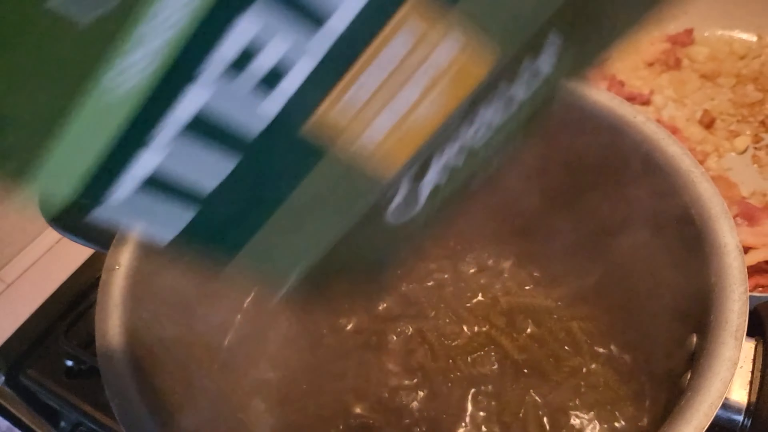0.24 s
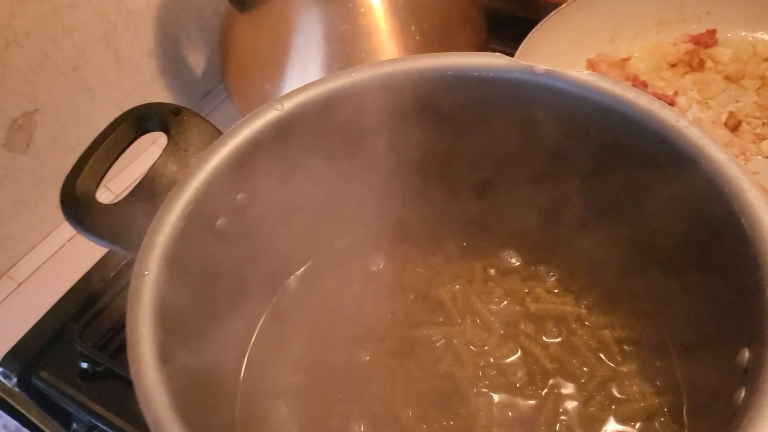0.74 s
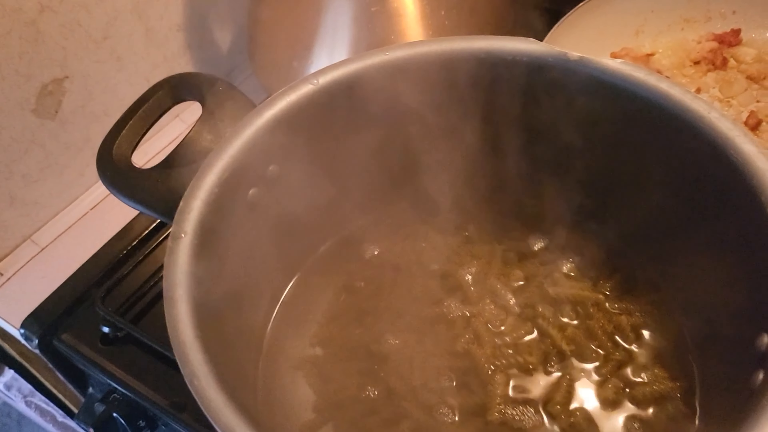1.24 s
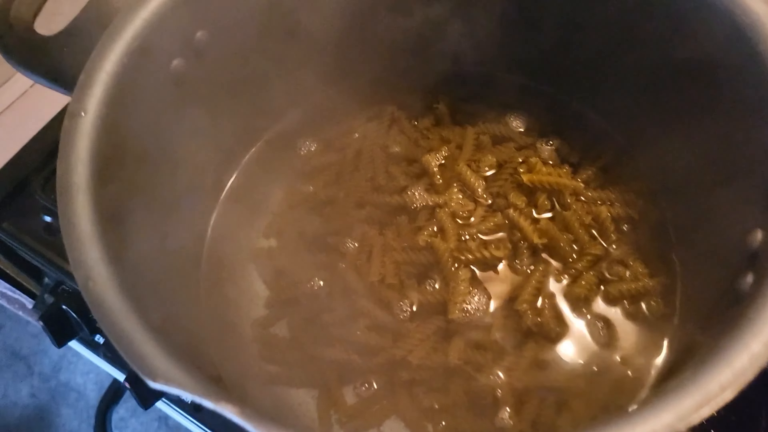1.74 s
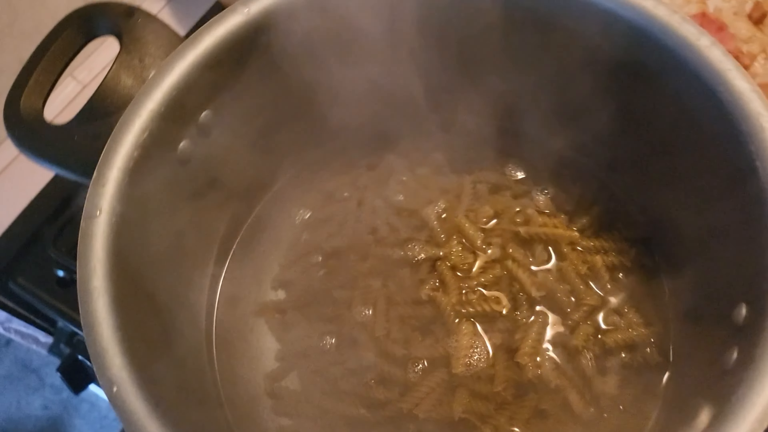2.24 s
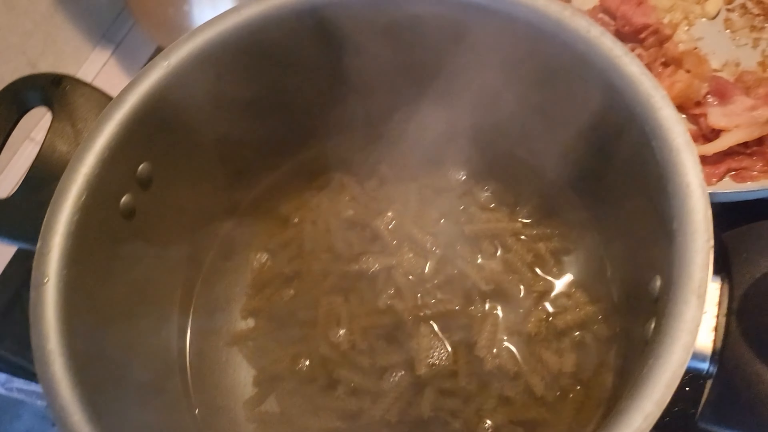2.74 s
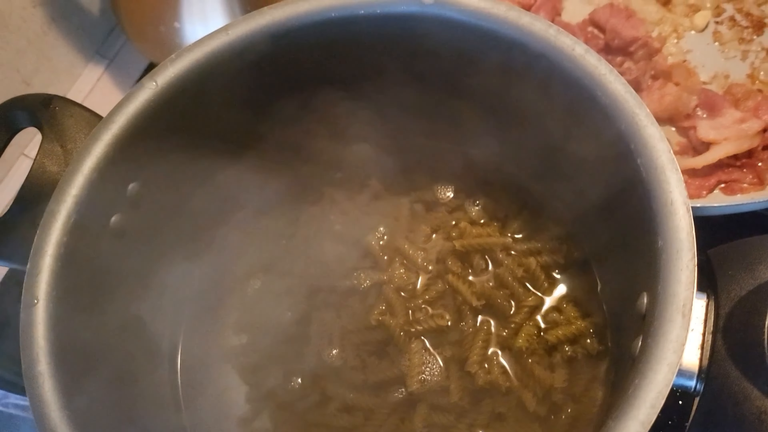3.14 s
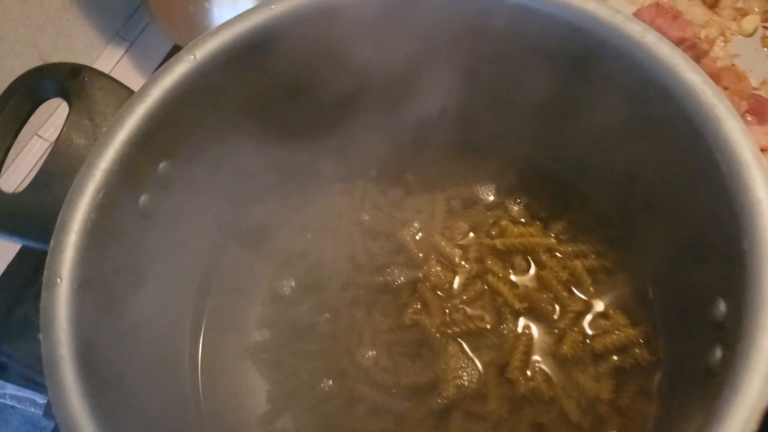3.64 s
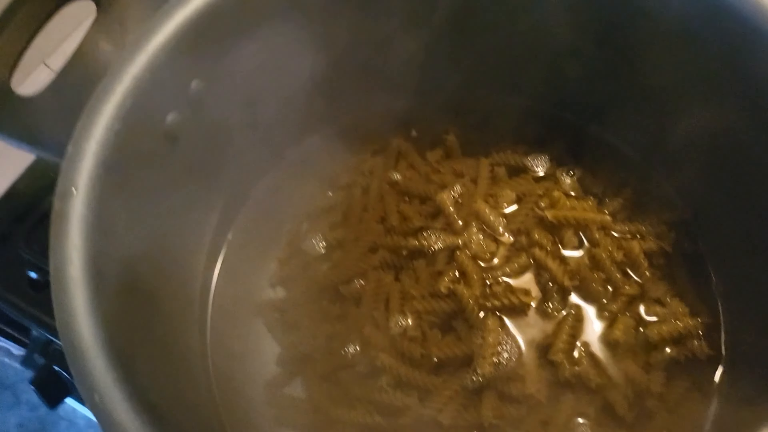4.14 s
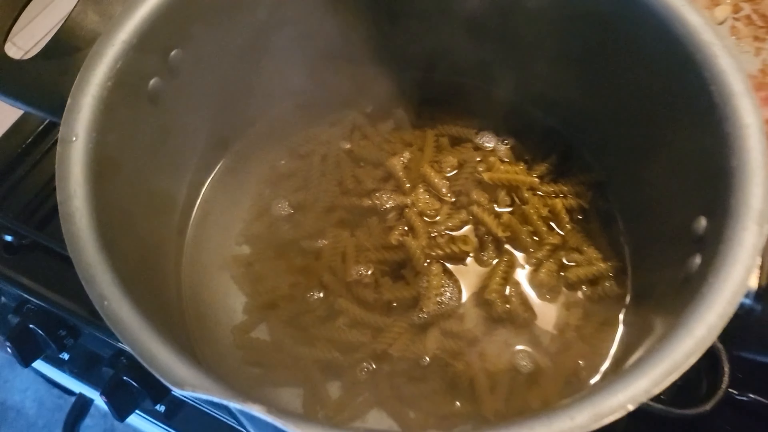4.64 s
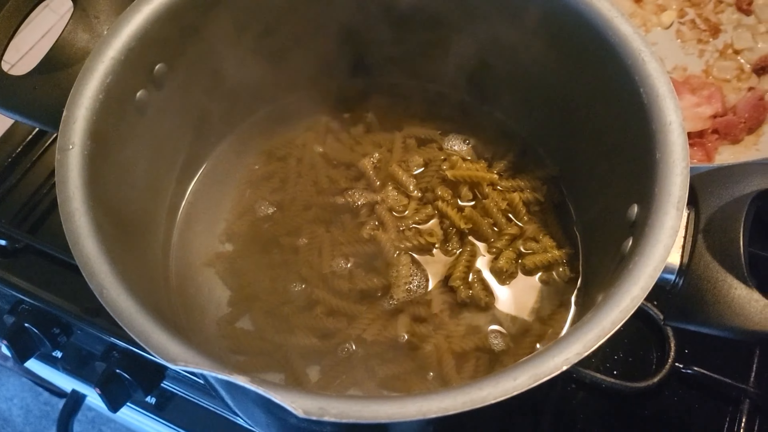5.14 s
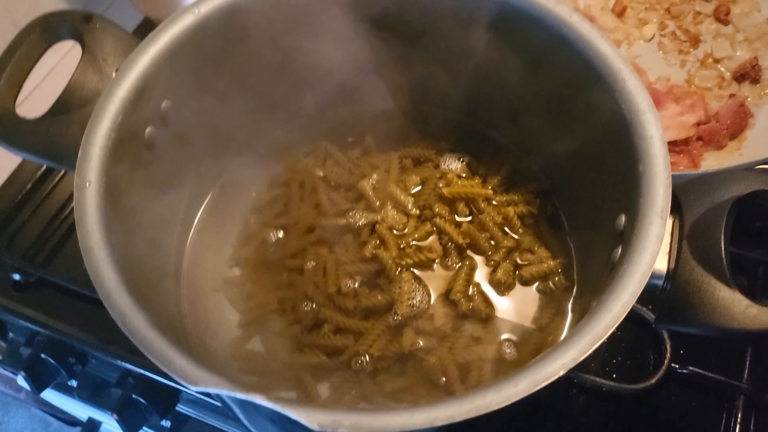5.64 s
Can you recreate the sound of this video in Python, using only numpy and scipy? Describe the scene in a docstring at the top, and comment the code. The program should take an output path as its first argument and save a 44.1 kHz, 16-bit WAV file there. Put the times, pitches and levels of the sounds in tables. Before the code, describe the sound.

A burst of bright, dry pasta clicks opens abruptly and dies within a fraction of a second. Over soft gas-flame rumble, thin hiss and quiet simmering, the card box taps and scuffs in a hand while water plops. Past the middle it lands with a loud, chattering knock, then the simmer continues. Small kitchen, close handheld stereo microphone.

```python
"""Dry pasta into a hot pot

The last pasta rattles out of a card box into hot water on a gas ring: brief impacts, filtered and ringing.
The box rustles and scuffs (dense random slips), the water plops and spits (decaying sines).
The box is set down with a sharp, chattering knock: impulses that crack and excite damped modes.
Filtered noise rumbles and hisses throughout; two microphone ports a hand apart hear it all in a small kitchen."""
import sys
import numpy as np
from scipy import signal
from scipy.fft import rfft, irfft, next_fast_len
from scipy.io import wavfile

SR = 44100
rng = np.random.default_rng(int(sys.argv[2]) if len(sys.argv) > 2 else 0)


def inscribe(sig):
    """Save sig as 16-bit PCM at rate SR to the path in sys.argv[1].

    A 1-D sig is mono; a 2-D sig holds one channel per row.
    Samples are clipped to [-1, 1] before scaling.
    """
    pcm = np.round(np.clip(np.atleast_2d(sig).T, -1, 1) * 32767)
    wavfile.write(sys.argv[1], SR, pcm.astype(np.int16))


N = 259731
TIME = np.arange(N) / SR
SIZE = next_fast_len(N + SR)   # padded transform length

# Levels are relative: each is set before softening, panning and the mix.
# clumps of pasta striking the mouth of the box: (t/s, level/dB, contact brightness f/Hz)
PASTA_STRIKES = [(0.0005, -20, 5000), (0.0048, -20, 15000), (0.0068, -14.5, 18000), (0.0142, -26, 12000),
                 (0.026, -27.5, 14000), (0.037, -30.5, 16000), (0.041, -29, 9000), (0.053, -32, 9000),
                 (0.063, -34.5, 12000), (0.07, -36, 8000), (0.0796, -31, 12500), (0.0872, -27, 9100),
                 (0.096, -45, 4500), (0.102, -43, 4500), (0.109, -39.5, 12000), (0.118, -42, 9000),
                 (0.13, -50, 18000), (0.152, -47, 9000), (0.169, -49.5, 10000), (0.22, -50.5, 6500),
                 (0.248, -61, 8100), (0.284, -63, 14100)]
# spectrum of pasta against card: (f/Hz, level/dB)
PASTA_SPECTRUM = [(500, -26.5), (950, -24.5), (1250, -13.5), (1850, -8.5), (2150, -8), (2480, 1.5),
                  (2900, -5), (3400, 5.5), (4200, -3), (4800, -0.5), (5500, -0.5), (6200, 4), (7200, -5),
                  (8000, -0.5), (8700, -8.5), (12500, -1), (15500, -9.5)]
# the box landing, rocking and coming to rest on the counter: (t/s, level/dB, contact brightness f/Hz)
BOX_KNOCKS = [(3.4074, -20.5, 19400), (3.4102, -13.5, 17000), (3.4137, -10.5, 12000), (3.4183, -13, 9000),
              (3.4227, -9.5, 5900), (3.4289, -13, 9000), (3.4312, -13, 5000), (3.4332, -14, 9050),
              (3.4371, -19, 3000), (3.4432, -20, 9000), (3.4513, -24.5, 1494), (3.459, -12, 251),
              (3.4807, -36, 16000), (3.4829, -30, 4000), (3.4853, -30.5, 7000), (3.4903, -30, 9000),
              (3.4977, -35, 4000), (3.502, -37, 14000), (3.5072, -32.5, 12000), (3.5116, -33.5, 3970),
              (3.5166, -38.5, 2470), (3.5982, -44, 600), (3.624, -46, 700), (3.7072, -46.5, 520)]
# spectrum of the card cracking against the counter: (f/Hz, level/dB)
CRACK_SPECTRUM = [(25, -25), (60, -11), (120, -7.5), (195, -9), (250, -5.5), (370, 3), (520, -8.5),
                  (720, -0.5), (900, -6.5), (1150, -5.5), (1850, -10), (2750, -15), (3150, -18),
                  (3700, -17.5), (4800, -23), (6300, -17), (7500, -24.5), (8700, -31), (12000, -28.5),
                  (14000, -25.5), (15500, -24.5)]
# box and counter ringing together: (f/Hz, level/dB, t60/s)
BOX_COUNTER_MODES = [(133.2, -19, 0.21), (160, -11, 0.15), (256.6, -22.5, 0.27), (348, -18.5, 0.13),
                     (380.5, -20, 0.18), (527, -28, 0.18), (645, -33, 0.3), (741, -9.5, 0.05),
                     (1074, -19.5, 0.06), (1184, -9.5, 0.052), (1536, -14, 0.068), (1996, -19.5, 0.05),
                     (2470, -23, 0.037), (2720, -17, 0.049)]
# the larger bubbles bursting in the pot: (t/s, level/dB, f/Hz)
LARGE_PLOPS = [(0.098, -45, 396), (0.166, -46, 254), (0.8135, -35, 534), (1.0498, -43.5, 590),
               (1.101, -54, 320), (1.267, -40.5, 536), (2.170, -47.5, 320), (2.214, -49, 322),
               (2.440, -43.5, 335), (2.518, -44, 676), (2.5709, -44.5, 700), (2.661, -51, 325),
               (3.179, -48.5, 292)]
# air in the pot, sounded by bursts: (f/Hz, level/dB, t60/s)
POT_AIR_MODES = [(318.3, -12.5, 0.22), (500, -5, 0.0087), (649, -2, 0.03), (800, -23, 0.013),
                 (1520, -49, 0.034), (2240, -35, 0.014)]
# drops spitting and hot metal ticking: (t/s, level/dB, f/Hz, t60/s)
SPIT_TICKS = [(0.548, -56, 6360, 0.0054), (0.665, -44.5, 6100, 0.003), (0.6684, -46.5, 12400, 0.0016),
              (0.7485, -50, 14760, .007), (2.52, -52, 1465, 0.15), (3.8807, -55.5, 12450, 0.0019),
              (4.8520, -46, 2790, 0.014), (4.8529, -52, 1185, 0.011), (4.8517, -49, 410, 0.019)]
# the box slipping in the hand:
# (peak t/s, rise/s, fall/s, level/dB, treble level/dB, rasp of the flap level/dB)
HAND_SLIPS = [(0.348, 0.018, 0.006, -66.5, 7.5, -23), (0.48, 0.023, 0.031, -68.5, -29.5, -25),
              (0.80, 0.029, 0.048, -72, -3, -21), (1.42, 0.15, 0.092, -67, 0, -9),
              (2.179, 0.0063, 0.006, -68, 5.5, -4.5), (2.535, 0.0071, 0.08, -78, 2.5, -4),
              (3.235, 0.048, 0.011, -66, -3.5, -15)]
# spectrum of card under the fingers: (f/Hz, level/dB)
RUSTLE_SPECTRUM = [(130, -37), (250, 2), (330, 4.5), (500, -3.5), (720, -1), (1000, -16), (1400, -5.5),
                   (1750, -14.5), (2300, -6.5), (3200, -15), (5000, -17), (6300, -13), (8500, -25),
                   (15500, -23)]
# the gas ring and pot: (t/s, rumble level/dB, simmer level/dB)
BURNER_LEVELS = [(0.0, -51, -61), (2.29, -51.5, -60.5), (2.95, -54, -63), (3.49, -53, -64.5),
                 (3.82, -55, -62.5), (5.53, -48.5, -61.5), (5.89, -49.5, -63)]
# spectra of flame, simmer and gas: (f/Hz, level/dB)
RUMBLE_SPECTRUM = [(12, -29.5), (20, 2.5), (48, -4), (70, 0.5), (85, -1), (108, -9), (146, -9.5),
                   (201, -22.5), (260, -42), (340, -77.5), (570, -120)]
SIMMER_SPECTRUM = [(140, -40), (230, -10), (350, 9), (480, 0.5), (650, -1.5), (850, 2.5), (1050, 5.5),
                   (1300, 5), (1700, -13.5), (2400, -22), (4400, -43)]
HISS_SPECTRUM = [(1000, -20.5), (1800, -2), (2500, -4), (3800, -6.5), (5000, -12.5), (7000, -14),
                 (8400, -26.5), (11000, -28), (15500, -26)]
# reverberation time of the kitchen: (f/Hz, t60/s)
ROOM_DECAY = [(100, 0.28), (500, 0.28), (2000, 0.13), (4000, 1), (14000, 0.073)]
# fingers and loose pasta tapping the card: (t/s, level/dB, contact brightness f/Hz)
CARD_TAPS = [(0.339, -42, 5000), (0.349, -43.5, 9000), (0.358, -50, 5000), (0.49, -56, 4000),
             (0.745, -47, 4000), (1.2038, -39.5, 9040), (1.207, -43.5, 5000), (1.2675, -47, 5000),
             (1.276, -48, 7000), (1.298, -47, 5000), (1.360, -48, 7000), (1.420, -48, 14000),
             (1.447, -52, 10000), (1.461, -42, 14000), (1.4722, -42, 6500), (1.478, -45, 5000),
             (2.1712, -51, 9500), (2.519, -45.5, 5006), (3.2268, -35, 6500), (3.235, -38.5, 4000),
             (3.2634, -44, 3500), (3.272, -45, 4000), (3.5812, -37.5, 1500), (3.5862, -32.5, 980),
             (3.594, -34, 905), (3.8835, -46.5, 6000)]
# spectrum of a tap: (f/Hz, level/dB)
TAP_SPECTRUM = [(120, -20.5), (300, 2.5), (500, -6.5), (680, 7.5), (950, -4.5), (1400, -0.5), (1800, -4.5),
                (2300, -19), (2800, -11.5), (3300, -20.5), (6300, -15.5), (8500, -37), (15500, -37)]
# modes of the tapped card: (f/Hz, level/dB, t60/s)
CARD_MODES = [(660, -29, 0.075), (1500, -11, 0.026), (2200, -26, 0.037)]
# resonances that the simmer keeps sounding: (f/Hz, level/dB, t60/s)
SIMMER_MODES = [(351.3, -8, 0.31), (615.6, 0.5, 0.041), (1220, -10.5, 0.08)]
# the card scuffing past a hand or the counter:
# (start t/s, length/s, level/dB, hollow of the box level/dB, airy treble level/dB, flap f/Hz)
SCUFF_STROKES = [(0.32, 0.045, -75, 15, -11, 2130), (1.264, 0.034, -62, -5, -22, 2430),
                 (1.392, 0.055, -73, 7, 4, 2530), (1.449, 0.019, -62.5, -17, -2, 4070),
                 (1.487, 0.05, -66.5, -9, -7, 2620), (1.725, 0.13, -60.5, 7.5, -8, 2450)]
# the hollow of the box: (f/Hz, level/dB, t60/s)
BOX_AIR_MODES = [(313, -7.5, 0.03), (692, -2.5, 0.045), (927, -2.5, 0.031), (1370, -8.5, 0.033)]
# the water coming back to the boil: (t/s, level/dB)
BOIL_LEVELS = [(0.0, -66), (2.4, -78.5), (4.2, -80), (4.9, -75.5), (5.3, -69.5), (5.45, -73.5), (5.67, -66),
               (5.89, -74)]
# the gas jet's faint whistles: (f/Hz, level/dB)
WHISTLE_TONES = [(930, -7), (1342, -7), (1690, -12.5)]
# their common level: (t/s, level/dB)
WHISTLE_LEVELS = [(0.0, -82.5), (2.0, -74.5), (2.8, -73.5), (4.0, -78.5), (5.89, -77)]

PORT_LAG_S, CUTOFF_HZ = .00044, 16000
EARLY_T60_S, LATE_DB = 0.1, -18.5   # near walls answer at once; the rest of the room lingers faintly
TAIL_T60_S, TAIL_TOP_HZ = .27, 3500   # what lingers after a contact is dull
SLIDE_DB, SLIDE_FADE_DB_PER_S = -35, 211.5   # the stream of pasta thins out as the box empties
SMALL_PLOPS_PER_S, SMALL_PLOP_DB, CALM_S = 7, -56, 2.7   # small ones stop once the water has calmed
GRIP_DB, GRIP_WAVER_DB = -79.5, 2   # the card creaks faintly for as long as it is held
FLAP_HZ, FLAP_T60_S = 2280, 0.0061   # the open flap rasps at its own pitch
SCUFF_ATTACK, SCUFF_RELEASE = 0.53, 0.25   # shares of a scuff's length
SCUFF_SAG_OCTAVES_PER_S, SCUFF_AIR_HZ = 1.4, 6100   # the rasp sinks as the stroke goes on
HISS_DB = -74.5   # the gas flows steadily
BOIL_HZ, BOIL_T60_S = 582, 0.099   # the pot rings with the boil


def from_db(db):
    """Logarithmic level: 20 dB is a tenfold amplitude."""
    return 10 ** (np.asarray(db) / 20)


def rms_one(x):
    """Normalization to unit mean-square power."""
    return x / np.sqrt(np.mean(x ** 2) + 1e-20)


def in_time(rows):
    """Linear interpolation in time, one curve per column."""
    s, *columns = np.transpose(rows)
    return [np.interp(TIME, s, c) for c in columns]


def at_hz(points, hz):
    """Linear interpolation on a logarithmic frequency axis."""
    f, value = np.transpose(points)
    return np.interp(np.log(np.maximum(hz, 1)), np.log(f), value)


def drift(rate):
    """Slow random modulation: unit-variance Gaussian knots, rate per second, joined by lines."""
    knots = rng.standard_normal(int(N / SR * rate) + 2)
    return np.interp(TIME * rate, np.arange(len(knots)), knots)


def click(s, db):
    """Impulse excitation at time s."""
    out = np.zeros(N)
    out[int(np.clip(s * SR, 0, N - 1))] = from_db(db)
    return out


def grains(per_s, spread_db):
    """Random impulse train: tiny contacts of uneven size and either sign."""
    sizes = from_db(spread_db * np.minimum(rng.exponential(1, N), 4))
    signs = rng.choice([-1, 1], N)
    return sizes * signs * (rng.random(N) < per_s / SR)


def ring(x, hz, t60):
    """Damped resonator: a unit impulse starts a decaying sine of initial height 1."""
    radius, w = from_db(-60 / (t60 * SR)), 2 * np.pi * hz / SR
    return signal.lfilter([0, np.sin(w)], [1, -2 * radius * np.cos(w), radius * radius], x + 1e-18)


def modes(x, rows, alternate=False):
    """Modal superposition: parallel resonators, with alternating polarity if asked."""
    flip = -1 if alternate else 1
    return sum(from_db(db) * ring(x, hz, t60) * flip ** k for k, (hz, db, t60) in enumerate(rows))


def coloured(x, spectrum):
    """Minimum-phase filtering by the folded cepstrum; its impulse response has peak 1."""
    size = 8192
    log_gain = np.log(from_db(at_hz(spectrum, np.arange(size // 2 + 1) * SR / size)))
    cepstrum = irfft(log_gain)
    cepstrum[1:size // 2] *= 2
    response = irfft(np.exp(rfft(cepstrum[:size // 2], size)))
    response = response / np.abs(response).max()
    return irfft(rfft(x, SIZE) * rfft(response, SIZE), SIZE)[..., :N]


def softened(x, bright_hz):
    """Contact time as a low-pass filter: a softer contact spreads the push."""
    return signal.lfilter(*signal.butter(2, min(bright_hz, .45 * SR), fs=SR), x + 1e-18)


def diffuse(length):
    """Diffuse-field coherence: the ports agree in the bass and are unrelated in the treble."""
    mid, side = rfft(rng.standard_normal((2, length)))
    alike = np.sinc(2 * PORT_LAG_S * np.arange(len(mid)) * SR / length)
    return irfft(np.sqrt(1 + alike) * mid + np.sqrt(1 - alike) * side * [[1], [-1]], length)


def at_ports(x):
    """Propagation delay: direct sound reaches the left port first."""
    return np.array([x, np.append(np.zeros(round(PORT_LAG_S * SR)), x)[:len(x)]])


def panned(both, pan_db):
    """Diffraction: left exceeds right by pan_db in the treble; bass bends round to both alike."""
    bass = signal.lfilter(*signal.butter(1, 250, fs=SR), both + 1e-18)
    return bass + (both - bass) * from_db(np.array([[.5], [-.5]]) * pan_db)


def steady(x, spectrum, room_db, pan_db):
    """Steady-state room field: unit-power sound plus a smooth diffuse wash, coloured and normalized."""
    field = at_ports(rms_one(x)) + from_db(room_db) * diffuse(N)
    return panned(rms_one(coloured(field, spectrum)), pan_db)


def kitchen(x, room_db, pan_db):
    """Reverberation: direct sound, then band-wise two-stage decay of a diffuse field."""
    t = TIME[:SR // 2]
    field, tail = rfft(diffuse(len(t))), 0
    hz = np.arange(field.shape[1]) * SR / len(t)
    edges = np.append(0, np.geomspace(200, SR / 2, 16))
    early = np.exp(-np.log(1000) * t / EARLY_T60_S)
    for low, high in zip(edges, edges[1:]):
        late = np.exp(-np.log(1000) * t / at_hz(ROOM_DECAY, (low + high) / 2))
        band = irfft(field * ((hz >= low) & (hz < high)), len(t))
        tail = tail + band * (early + from_db(LATE_DB) * late)
    tail = rms_one(tail * (t > .002)) / np.sqrt(len(t))
    reflections = signal.fftconvolve(x[None], tail)[:, :N]
    return panned(at_ports(x) + from_db(room_db) * reflections, pan_db)


def dying(noise, t60_s):
    """Exponential decay of noise, scaled to unit energy per channel on average."""
    out = noise * from_db(-60 * TIME[:noise.shape[-1]] / t60_s)
    return rms_one(out) / np.sqrt(noise.shape[-1])


def contacts(rows, colour, shake_db, shake_t60_s, walls_db, walls_t60_s, tail_db, pan_db, walls_pan_db):
    """Impact excitation: a push and a shiver of loose pieces, with fresh wall reflections each time."""
    length = SR // 3
    out, rattle = np.zeros((2, N + length)), grains(per_s=6000, spread_db=1.5)[:length]
    for s, db, bright_hz in rows:
        push = np.append(1, np.zeros(length - 1))
        direct = push + from_db(shake_db) * dying(rng.permutation(rattle), shake_t60_s)
        tail = signal.lfilter(*signal.butter(1, TAIL_TOP_HZ, fs=SR), dying(diffuse(length), TAIL_T60_S))
        walls = from_db(walls_db) * dying(diffuse(length), walls_t60_s) + from_db(tail_db) * tail
        both = panned(at_ports(direct), pan_db) + panned(walls, walls_pan_db)
        start = max(int(s * SR), 0)
        out[:, start:start + length] += from_db(db) * softened(both, bright_hz)
    return coloured(out, colour)


def pushes(rows):
    """Impulse superposition: one softened push per contact."""
    return sum(softened(click(s, db), bright_hz) for s, db, bright_hz in rows)


def pasta(own_ring_db=-17.0, own_t60_s=0.0058):
    """Impact and free vibration: pieces click on each other and the card, each clump ringing briefly."""
    stream = steady(grains(per_s=830, spread_db=4.0), PASTA_SPECTRUM, room_db=2.5, pan_db=-3.0)
    slide = from_db(SLIDE_DB - SLIDE_FADE_DB_PER_S * TIME) * stream
    strikes = contacts(PASTA_STRIKES, PASTA_SPECTRUM, shake_db=9.5, shake_t60_s=0.018, walls_db=12.5,
                       walls_t60_s=0.06, tail_db=0.5, pan_db=3.0, walls_pan_db=3.5)
    # three random pitches for each clump
    pitches = np.exp(rng.uniform(np.log(2800), np.log(8500), (len(PASTA_STRIKES), 3)))
    rings = sum(ring(click(s, db + own_ring_db), hz, own_t60_s)
                for (s, db, _), own in zip(PASTA_STRIKES, pitches) for hz in own)
    return slide + strikes + at_ports(rings)


def burner(cycles=10.0, bubble_db=-7.0, pot_db=-7.0):
    """Broadband noise and resonance: flame rumbles, simmer sounds the pot, gas hisses on the right."""
    rumble_db, simmer_db = in_time(BURNER_LEVELS)
    flame = steady(rng.standard_normal(N), RUMBLE_SPECTRUM, room_db=3.5, pan_db=-6.5)
    flame = flame * from_db(0.9 * drift(rate=12.0))
    simmer = steady(grains(per_s=210, spread_db=-1.5), SIMMER_SPECTRUM, room_db=-11.5, pan_db=-2.5)
    bubbles = rms_one(sum(ring(grains(per_s=1.2, spread_db=-1.0), hz, cycles / hz)
                          for hz in np.geomspace(320, 1500, num=12)))
    hollow = rms_one(modes(grains(per_s=1600, spread_db=1.0), SIMMER_MODES))
    simmer = simmer + panned(at_ports(from_db(bubble_db) * bubbles), pan_db=2.0)
    simmer = simmer + from_db(pot_db) * hollow   # the mouth of the pot lies straight ahead
    hiss = steady(grains(per_s=8020, spread_db=-0.5), HISS_SPECTRUM, room_db=13.0, pan_db=-11.5)
    return from_db(rumble_db + 1.5) * flame + from_db(simmer_db - 4.0) * simmer + from_db(HISS_DB) * hiss


def boil(cycles=12.0, pot_db=-7.0, surge_db=2.0):
    """Bubble resonance: bubbles of nine pitches surge as the water heats, and drive a mode of the pot."""
    pitches = np.geomspace(480, 950, num=9)
    bursts = [grains(per_s=22.0, spread_db=1.5) for _ in pitches]
    bubbles = rms_one(sum(ring(burst, hz, cycles / hz) for burst, hz in zip(bursts, pitches)))
    pot = rms_one(ring(sum(bursts), BOIL_HZ, BOIL_T60_S))
    level = from_db(in_time(BOIL_LEVELS)[0] + surge_db * drift(rate=15.0))
    return panned(at_ports(level * (bubbles + from_db(pot_db) * pot)), pan_db=-8.5)


def whistles(wander_hz=7.0, waver_db=3.0):
    """Frequency and amplitude modulation: thin tones in the gas flow wander in pitch and level."""
    tones = 0
    for hz, db in WHISTLE_TONES:
        level = from_db(db + waver_db * drift(rate=12.0))
        phase = 2 * np.pi * np.cumsum(hz + wander_hz * drift(rate=74.0)) / SR
        tones = tones + level * rms_one(np.sin(phase))
    return from_db(in_time(WHISTLE_LEVELS)[0]) * tones


def rustle(card_db=1.0, catch_db=1.0):
    """Stick-slip friction: dense slips of card under the fingers swell, catch and die away."""
    slips = rms_one(coloured(grains(per_s=11000, spread_db=10.5), RUSTLE_SPECTRUM))
    dull = signal.sosfiltfilt(signal.butter(2, 3200, fs=SR, output="sos"), slips)
    flap = rms_one(ring(grains(per_s=1100, spread_db=4.5), FLAP_HZ, FLAP_T60_S))
    held = TIME < BOX_KNOCKS[0][0]
    out = from_db(GRIP_DB + GRIP_WAVER_DB * drift(rate=16.0)) * slips * held
    for s, rise_s, fall_s, db, treble_db, flap_db in HAND_SLIPS:
        swell = np.exp(-np.clip(np.maximum((s - TIME) / rise_s, (TIME - s) / fall_s), 0, 20))
        card = dull + from_db(treble_db) * (slips - dull) + from_db(flap_db) * flap
        out = out + from_db(db) * swell * card
    return kitchen(from_db(card_db + catch_db * drift(rate=570.0)) * out, room_db=5.5, pan_db=-1.0)


def plops(cycles=23.0, bubble_db=-10.0):
    """Bubble and cavity resonance: a bubble rings a few cycles; its burst sounds the air in the pot."""
    bubbles = sum(ring(click(s, db), hz, cycles / hz) for s, db, hz in LARGE_PLOPS)
    small = from_db(SMALL_PLOP_DB) * grains(per_s=SMALL_PLOPS_PER_S, spread_db=1.0) * (TIME < CALM_S)
    bursts = small + sum(click(s, db) for s, db, _ in LARGE_PLOPS)
    air = modes(bursts, POT_AIR_MODES, alternate=True)
    return kitchen(from_db(bubble_db) * bubbles + air, room_db=-3.5, pan_db=1.5)


def scuffs(flap_t60_s=0.0042, air_t60_s=0.003, catch_db=3.0):
    """Stick-slip friction: each stroke sounds the box's hollow, its flap and an airy rasp."""
    out = np.zeros(N)
    slips = grains(per_s=3500, spread_db=4.0) * from_db(catch_db * drift(rate=160.0))
    for s, length_s, db, hollow_db, air_db, flap_hz in SCUFF_STROKES:
        start, t = int(s * SR), TIME[:int(length_s * SR)]
        rub, u = slips[start:start + len(t)], t / length_s
        hollow = rms_one(modes(rub, BOX_AIR_MODES, alternate=True))
        # differentiation favours the treble
        flap = rms_one(np.gradient(ring(rub, flap_hz, flap_t60_s)))
        air = rms_one(np.gradient(ring(rub, SCUFF_AIR_HZ, air_t60_s)))
        rasp = flap + from_db(air_db) * air
        # reading ever more slowly lowers the pitch
        rasp = np.interp(np.cumsum(2 ** (-SCUFF_SAG_OCTAVES_PER_S * t)) / SR, t, rasp)
        swell = np.clip(np.minimum(u / SCUFF_ATTACK, (1 - u) / SCUFF_RELEASE), 0, 1) ** 0.75
        out[start:start + len(t)] += from_db(db) * swell * (rasp + from_db(hollow_db) * hollow)
    return kitchen(out, room_db=1.0, pan_db=0.5)


def taps():
    """Impact excitation of a light plate: touches on the card, which rings briefly."""
    touch = contacts(CARD_TAPS, TAP_SPECTRUM, shake_db=1.0, shake_t60_s=0.045, walls_db=-3.5,
                     walls_t60_s=0.091, tail_db=-18.0, pan_db=-8.0, walls_pan_db=9.0)
    card = modes(pushes(CARD_TAPS), CARD_MODES, alternate=True)
    return touch + panned(at_ports(card), pan_db=-17.0)


def spits():
    """Free damped vibration: small ticks, each ringing at one pitch."""
    ticks = sum(ring(click(s, db), hz, t60) for s, db, hz, t60 in SPIT_TICKS)
    return kitchen(ticks, room_db=-12.0, pan_db=-8.5)


def knock(ring_db=-2.5):
    """Modal excitation by impact: contacts crack the card, shake the pasta left and ring box and counter."""
    crack = contacts(BOX_KNOCKS, CRACK_SPECTRUM, shake_db=2.5, shake_t60_s=0.027, walls_db=6.5,
                     walls_t60_s=0.067, tail_db=-7.5, pan_db=-9.0, walls_pan_db=-2.0)
    # the crack carries nothing below about 50 Hz
    crack = signal.lfilter(*signal.butter(2, 50, "high", fs=SR), crack)
    body = modes(pushes(BOX_KNOCKS), BOX_COUNTER_MODES)
    return crack + from_db(ring_db) * panned(at_ports(body), pan_db=-11.5)


def scene():
    """Linear superposition of every source at the stove."""
    gas_and_water = burner() + boil() + whistles() + plops() + spits()
    box = pasta() + rustle() + scuffs() + taps() + knock()
    return gas_and_water + box


def record(dry):
    """Saturation and band limiting: the highest peaks are rounded and the top is cut steeply."""
    top = from_db(10.5)
    rounded = top * np.tanh(dry / top)
    return signal.sosfilt(signal.ellip(12, .1, 80, CUTOFF_HZ, fs=SR, output="sos"), rounded)


dry = scene()
out = record(dry)
inscribe(out)
```